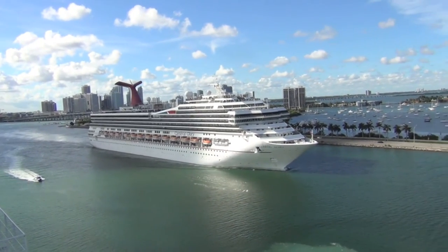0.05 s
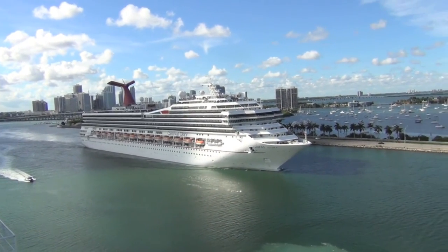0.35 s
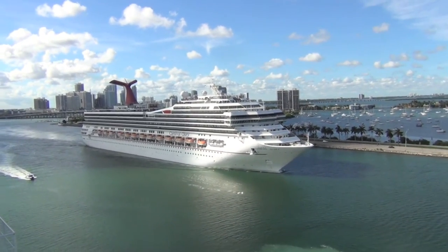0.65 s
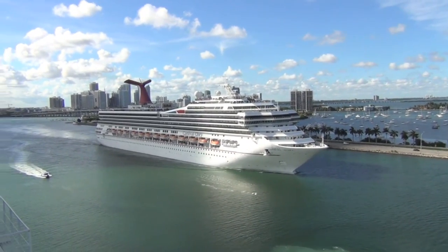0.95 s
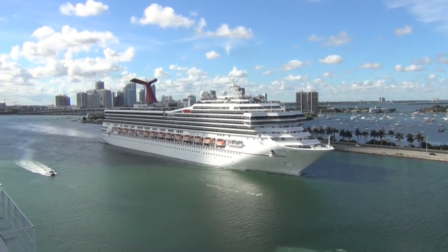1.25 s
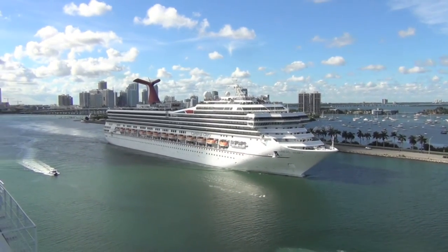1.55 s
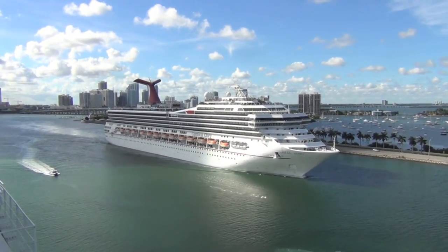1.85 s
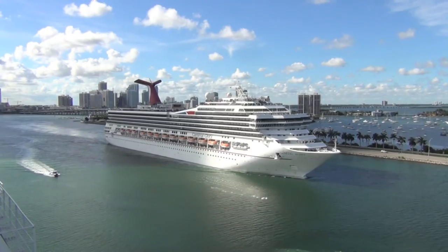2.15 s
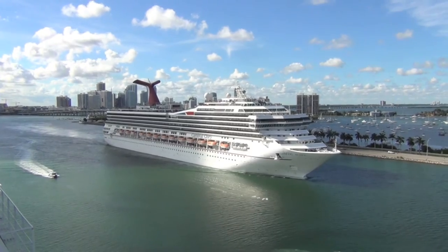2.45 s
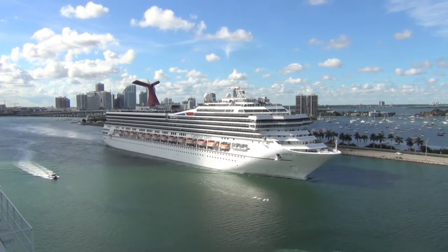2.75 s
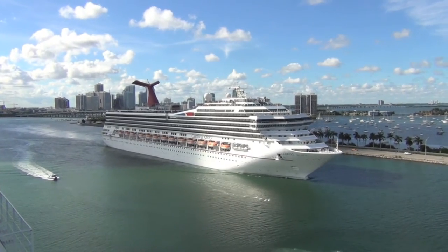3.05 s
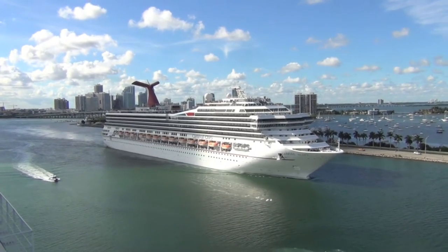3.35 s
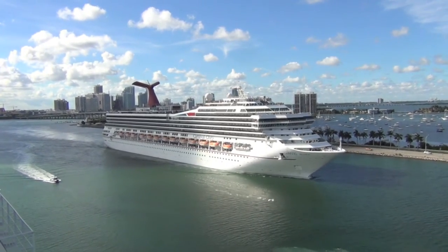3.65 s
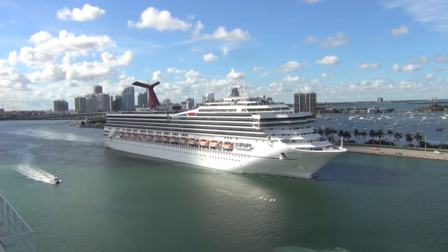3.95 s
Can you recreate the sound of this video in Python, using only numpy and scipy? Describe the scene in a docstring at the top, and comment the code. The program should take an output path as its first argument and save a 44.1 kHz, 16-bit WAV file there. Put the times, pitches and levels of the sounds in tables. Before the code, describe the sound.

A cruise ship holds one long, deep horn blast, heard from high above a harbour. Its brassy buzz wavers in the gusty air, while low wind rumbles on the microphone over a faint wash of water.

```python
"""A cruise ship holds one long, deep horn blast, heard from high up across a harbour.
The horn sends one sharp pressure pulse per cycle. Two paths through gusty air drift against each other and sweep
a notch through its buzz; faint echoes scatter off hull and water. Wind rumbles at the microphone, which ticks twice."""
import sys
import numpy as np
from scipy import signal
from scipy.io import wavfile
from scipy.ndimage import uniform_filter1d

SR = 44100
rng = np.random.default_rng(int(sys.argv[2]) if len(sys.argv) > 2 else 0)


def dump(signal):
    """Clip the signal to [-1, 1] and save it as 16-bit WAV at the path in sys.argv[1]."""
    limited = np.clip(np.atleast_2d(signal).T, -1, 1)
    pcm = np.round(limited * 32767).astype(np.int16)
    wavfile.write(sys.argv[1], SR, pcm)


N = 176400

# horn pitch (s, Hz)
PITCH = [(0, 136.65), (.3, 136.52), (.8, 136.54), (1.2, 136.68), (1.5, 136.76), (1.85, 136.68), (2.15, 136.78), (2.4, 136.72), (2.9, 136.7), (3.5, 136.79), (4, 136.75)]  # fixed
# the horn's lower harmonics (multiple, dB)
HARMONICS = [(1, -4), (2, 0), (3, -16), (4, -15), (5, -18), (6, -14), (7, -14), (8, -20), (9, -24), (10, -23),
             (11, -25), (12, -23), (13, -27), (14, -28), (15, -29), (16, -29), (17, -39), (18, -34), (19, -33),
             (20, -30), (21, -32), (22, -31), (23, -33), (24, -37), (25, -38), (26, -36)]  # fixed
# its harmonics above those (Hz, dB)
TOP = [(3650, -33), (4000, -33), (4300, -35.5), (5200, -37), (6200, -38.5), (7100, -38), (7800, -43.5), (8500, -42), (9500, -52.5), (11000, -61.5), (12500, -73.5), (14500, -81)]
# level of the two lowest harmonics (s, dB)
BASS = [(0.03, -12), (0.16, -11), (0.58, -14), (0.67, -13), (1.2, -18), (1.3, -14), (1.77, -12), (1.94, -15),
        (2.02, -12), (2.58, -11), (2.89, -12), (3.03, -15), (3.4, -14), (3.49, -12), (3.67, -15), (3.97, -11)]  # fixed
# level of the third harmonic, which fades deeply (s, dB)
THIRD = [(0.0, -26), (0.05, -28), (0.41, -27), (0.56, -34), (1.04, -33.5), (1.18, -35), (1.79, -26), (1.93, -32.5),
         (2.57, -25.5), (2.88, -32), (3.01, -59), (3.06, -44), (3.16, -61), (3.5, -30.5), (3.6, -33), (3.71, -46),
         (3.9, -28.5), (4.0, -29)]
# level of the fourth harmonic (s, dB)
FOURTH = [(0.03, -26), (0.06, -25), (0.54, -28), (0.74, -26), (1.21, -32), (1.73, -26), (1.91, -32), (2.11, -27),
          (2.34, -31), (2.5, -40), (2.58, -28), (3.38, -33), (3.58, -28), (3.66, -33), (3.85, -30), (3.89, -45),
          (3.93, -33), (3.97, -37)]  # fixed
# level of the midrange blare (s, dB)
BLARE = [(0.04, -24), (0.29, -23), (0.48, -27), (0.84, -28), (0.93, -26), (1.14, -28), (1.29, -25), (1.75, -26),
         (1.84, -23), (1.93, -27), (2.03, -24), (2.17, -29), (2.36, -23), (2.55, -21), (2.76, -25), (2.92, -23),
         (3.03, -25), (3.6, -19), (3.64, -22), (3.96, -20)]  # fixed
# level of the treble buzz (s, dB)
BUZZ = [(0.14, -38.5), (0.17, -37.5), (0.39, -44), (0.5, -34), (0.7, -36), (0.99, -34), (1.12, -32.5), (1.24, -33),
        (1.33, -37.5), (1.52, -32.5), (1.65, -36), (1.91, -38), (2.12, -37), (2.16, -32.5), (2.29, -31.5), (2.37, -37.5),
        (2.6, -40), (2.62, -36), (2.91, -38), (3.08, -34), (3.39, -40.5), (3.53, -38.5), (3.54, -39), (3.6, -38.5),
        (3.73, -34.5), (3.81, -36.5), (3.91, -33.5), (3.98, -36)]
# lag of the second air path behind the first (s, ms)
LAG = [(0, .3), (.2, .25), (.36, .14), (.46, .1), (.55, .08), (.68, .06), (.8, .035), (1, .018), (1.26, .012), (1.35, .115), (1.45, .08), (1.51, .03), (1.61, .045), (1.7, .14), (1.8, .115), (1.88, .075), (1.96, .045), (2.07, .097), (2.17, .052), (2.36, .052), (2.44, .115), (2.55, .105), (2.62, .05), (2.8, .06), (2.9, .105), (3.0, .1), (3.07, .048), (3.18, .05), (3.26, .09), (3.35, .05), (3.55, .062), (3.7, .048), (4, .06)]  # fixed
SECOND_PATH = .7  # fixed
BASS_DB, THIRD_DB, FOURTH_DB, BLARE_DB, BRASS_DB, BUZZ_DB = 0.04, -0.3, -0.76, -0.54, 1.5, 0.18  # trims
FLICKER_DB, FLICKER_HZ = 1.44, 40  # turbulence also shakes the strength of the buzz
# scattered echoes (Hz, dB per harmonic)
SCATTER = [(137, -37.5), (273, -41), (410, -47), (550, -50), (1000, -38), (1600, -44.5), (2500, -53), (4000, -58.5), (7000, -63.5), (8700, -70.5), (11000, -86.5), (15000, -102)]
PAN = [(60, -1.5), (92, 2), (140, -2.5), (210, 5), (330, -2), (500, -5), (770, 4.5), (1170, -0.5),
       (1790, 0.5), (2740, -1.5), (4190, 0.0), (6410, 1.5), (9810, -1.5), (15000, 5)]  # (Hz, left minus right dB)
LEAD = [(0, 0), (5170, 0.076), (7410, -0.4), (7920, 0.0), (15400, -0.0)]  # (Hz, radians by which left leads)
# wind at the microphone (Hz, dB per Hz) and its level (s, dB)
WIND = [(15, -29), (30, -17.5), (52, 0.5), (100, 3), (160, 0.5), (280, -2.5), (450, -9), (1000, -37.5), (4000, -71)]
GUSTS = [(0.06, -41), (0.88, -42), (0.95, -35), (1.0, -47), (1.32, -38.5), (2.24, -45.5), (2.45, -40), (2.49, -46),
         (2.71, -37.5), (2.8, -41), (2.9, -43), (3.03, -47), (3.45, -40.5), (3.94, -43)]
WIND_DB, WIND_PATCH_DB, WIND_WIDTH = 7, 1, 0.21
# harbour wash (Hz, dB per Hz)
WASH = [(30, -12.5), (200, -9), (500, 4), (900, 4), (1500, 1), (2200, -5.5), (3300, -11.5), (5000, -14), (7500, -15.5), (9000, -25.5), (11000, -34), (13000, -38.5), (15500, -42.5)]
WHINE_HZ, WHINE_DB, WHINE_WIDTH_HZ = 492, -50, 3  # a faint distant machine
# ticks at the camera (s, peak dB, ring Hz, upper mode dB)
TICKS = [(0.094, -17, 4950, -9), (3.5443, -21.5, 4260, -10)]
EDGE_HZ = 15830  # fixed
HOP = 128  # fixed
TIME = np.arange(N) / SR
FRAMES = np.arange(N // HOP + 2) * HOP / SR
# slope of the buzz as turbulence blurs or sharpens the pulses (s, dB per kHz)
TILT = [(0.0, 1.5), (0.18, -1.5), (0.3, 0.7), (0.36, -2), (0.48, -2.9), (0.56, 0.26), (1.25, 0.9), (1.3, 0.2),
        (1.37, -3.5), (1.52, 2.1), (1.61, 0.1), (1.74, -2.5), (1.83, -2.7), (1.96, 3.2), (2.06, -0.1), (2.34, 2),
        (2.44, -2.5), (2.54, -1.3), (2.63, 2.3), (2.74, 1), (2.87, -1.3), (3.01, -0.3), (3.15, 1.8), (3.23, -0.2),
        (3.69, 2.2), (3.99, 0.5)]
TILT_SHARE, TILT_LIMIT_HZ = 0.94, 9000
# weak stray paths (lag ms, strength)
STRAYS = [(.3, .13), (.55, .12), (.85, .1), (1.25, .1)]  # fixed
STRAY_DRIFT_MS, STRAY_HZ = .08, 3  # fixed
DECK_MS = None
DECK = None
# level of the brassy upper midrange (s, dB)
BRASS = [(0.04, -32.5), (0.1, -44), (0.4, -31.5), (0.78, -34.5), (0.8, -35), (1.28, -34.5), (1.31, -30.5), (1.52, -33),
         (2.12, -31), (2.22, -37.5), (2.35, -34.5), (2.8, -37), (2.89, -31.5), (3.05, -33), (3.72, -32.5), (3.96, -29)]
PAN_DRIFT_DB_PER_S = -0.36  # the horn creeps to the right
WASH_DB, WASH_WIDTH = -38.5, 0.096
WASH_PATCH_DB = 2  # fixed
# how far the seventh harmonic stands out of the blare (s, dB)
SEVENTH = [(0, 4), (.35, 5), (.6, 2), (.8, -1), (1.2, 0), (1.5, 1), (1.75, -4), (2.05, 1), (2.25, -2), (2.55, -1.5), (2.9, 0), (3.55, .5), (3.8, -1.5), (4, -1)]  # fixed
JITTER_HZ = 25
JITTER_MS = .012  # fixed
FLUTTER_HZ = 22
FLUTTER = .045  # fixed
SCATTER_WIDTH = 0.27  # their share of side signal
SCATTER_HZ, SCATTER_HZ_PER_KHZ = 3, 0.52  # how fast they wander: high harmonics faster
TICK_DECAY_S, TICK_RISE_S, TICK_UPPER, TICK_NOISE_DB = .0007, 0.00034, 1.89, -4
TICK_UPPER_DB = None
STRAY_FULL_LAG_MS = 0.051  # the strays fade out in calm air, when the main paths arrive together


def amp(db):
    """Decibels to gain."""
    return 10 ** (np.asarray(db) / 20)


def unit(x):
    """Scales to rms 1."""
    return x / np.sqrt(np.mean(abs(x) ** 2) + 1e-20)


def curve(points, t):
    """Reads a curve in time."""
    return np.interp(t, *np.transpose(points))


def spectrum(points, hz):
    """Reads a table on a log-frequency axis."""
    f, value = np.transpose(points)
    return np.interp(np.log(hz + 1), np.log(f + 1), value)


def wander(rate_hz, count):
    """Rows of slow complex chance at frame rate, rms 1."""
    size = 2 * len(FRAMES)
    z = rng.standard_normal((count, size, 2)) @ [1, 1j]
    z = z / (1 + (np.fft.fftfreq(size, HOP / SR) / rate_hz) ** 2)
    return unit(np.fft.ifft(z)[:, :len(FRAMES)])


def noise(shape, patch_db, width):
    """Stereo noise of a given spectrum with drifting patches."""
    hz = np.fft.rfftfreq(2048, 1 / SR)  # fixed
    a, b, c, d, patches = rng.standard_normal((5, N // 512 + 5, len(hz)))  # fixed
    patches = unit(uniform_filter1d(uniform_filter1d(patches, size=9, axis=0), size=7, axis=1))
    z = np.array([a + 1j * b, c + 1j * d]) * amp(spectrum(shape, hz) + patch_db * patches)
    mid, side = signal.istft(z.swapaxes(1, 2), nperseg=2048, noverlap=1536)[1][:, :N]  # fixed
    return unit(np.array([mid + width * side, mid - width * side]))


def horn_pulse(hz):
    """Complex harmonics of one cycle: a sharp pressure step and the causal ring of the horn after it."""
    db = spectrum(TOP, hz)
    db[:len(HARMONICS)] = np.transpose(HARMONICS)[1]
    log_gain = np.log(amp(np.r_[db[2], db, db[-2::-1]]))
    return -np.exp(np.conj(signal.hilbert(log_gain)))[1:len(hz) + 1]


def through_air(pulse, hz):
    """Paths through the air interfere; each register swells and fades on its own."""
    khz = hz[:, None] / 1000  # fixed
    turn = -2j * np.pi * khz
    gains = pulse[:, None] * (1 + SECOND_PATH * np.exp(turn * curve(LAG, FRAMES)))
    bass, third, fourth, blare, brass, buzz = np.split(gains, [2, 3, 4, 8, 16])  # fixed
    blare[2] *= amp(curve(SEVENTH, FRAMES))  # fixed
    high = slice(-len(buzz), None)
    drift = STRAY_DRIFT_MS * wander(STRAY_HZ, count=len(STRAYS)).real
    strays = sum(strength * np.exp(turn[high] * (lag + d)) for (lag, strength), d in zip(STRAYS, drift))
    slope_db = curve(TILT, FRAMES) * np.minimum(khz[high], TILT_LIMIT_HZ / 1000)  # fixed
    unrest = np.minimum(curve(LAG, FRAMES) / STRAY_FULL_LAG_MS, 1)
    buzz = buzz * (1 + unrest * strays) * amp(TILT_SHARE * slope_db)
    flicker_db = FLICKER_DB * unit(wander(FLICKER_HZ, count=1).real)
    registers = [(bass, BASS, BASS_DB), (third, THIRD, THIRD_DB), (fourth, FOURTH, FOURTH_DB),
                 (blare, BLARE, BLARE_DB), (brass, BRASS, BRASS_DB), (buzz, BUZZ, BUZZ_DB + flicker_db)]
    gains = np.vstack([g / np.linalg.norm(g, axis=0) * amp(curve(level, FRAMES) + db) for g, level, db in registers])
    gains = gains * (1 + FLUTTER * np.sqrt(khz) * wander(FLUTTER_HZ, count=len(hz)))
    return gains * np.exp(turn * JITTER_MS * unit(wander(JITTER_HZ, count=1).real))


def horn(count=106):
    """A steady train of pulses, direct and scattered, at the two microphone ports."""
    pitch = curve(PITCH, TIME)
    hz = np.arange(1, count + 1) * pitch.mean()
    echo = amp(spectrum(SCATTER, hz))[:, None]
    rate_hz = SCATTER_HZ + SCATTER_HZ_PER_KHZ * hz[:, None] / 1000  # fixed
    mid = through_air(horn_pulse(hz), hz) + echo * wander(rate_hz, count=count)
    side = SCATTER_WIDTH * echo * wander(rate_hz, count=count)
    port = (amp(spectrum(PAN, hz) / 2) * np.exp(.5j * spectrum(LEAD, hz)))[:, None]
    cycle, wave, out = np.exp(2j * np.pi * np.cumsum(pitch) / SR), 1, np.zeros((2, N))
    for left, right in zip((mid + side) * port, (mid - side) / port):
        wave = wave * cycle
        out[0] += (wave * np.interp(TIME, FRAMES, left)).real
        out[1] += (wave * np.interp(TIME, FRAMES, right)).real
    return np.sqrt(2) * out * amp(np.outer([.5, -.5], PAN_DRIFT_DB_PER_S * (TIME - TIME.mean())))


def wind():
    """Lumpy low rumble that follows the gusts."""
    return noise(WIND, WIND_PATCH_DB, WIND_WIDTH) * amp(curve(GUSTS, TIME) + WIND_DB)


def harbour():
    """A wash of water and boats with one faint machine whine."""
    whine = np.interp(TIME, FRAMES, wander(WHINE_WIDTH_HZ, count=1)[0]) * np.exp(2j * np.pi * WHINE_HZ * TIME)
    return amp(WASH_DB) * noise(WASH, WASH_PATCH_DB, WASH_WIDTH) + amp(WHINE_DB) * unit(whine.real)


def ticks():
    """Tiny knocks on the camera: two short modes and a little grit."""
    out, grit = np.zeros(N), amp(TICK_NOISE_DB) * unit(uniform_filter1d(rng.standard_normal(N), size=3))
    for start, db, hz, upper_db in TICKS:
        t = np.maximum(TIME - start, 0)
        ring = np.sin(2 * np.pi * hz * t) + amp(upper_db) * np.sin(2 * np.pi * hz * TICK_UPPER * t)
        out += amp(db) * np.minimum(t / TICK_RISE_S, np.exp((TICK_RISE_S - t) / TICK_DECAY_S)) * (ring + grit)
    return out


def scene():
    """The horn over harbour and wind."""
    return horn() + harbour() + wind() + ticks()


def record(dry):
    """The recorder's band limit."""
    return signal.oaconvolve(dry, signal.firwin(511, EDGE_HZ, window=("kaiser", 9), fs=SR)[None], "same")  # fixed


dry = scene()
out = record(dry)
dump(out)
```